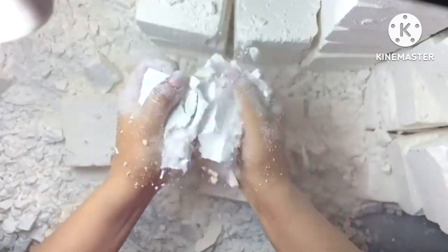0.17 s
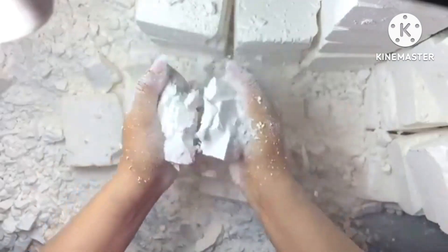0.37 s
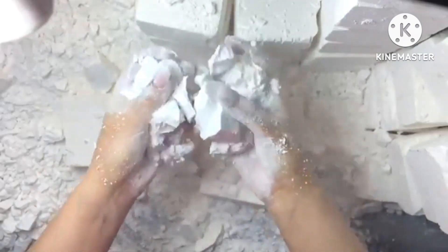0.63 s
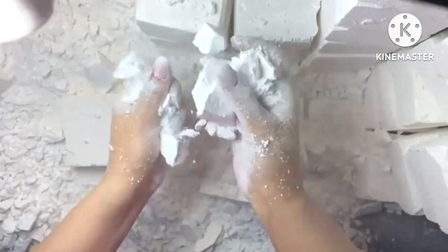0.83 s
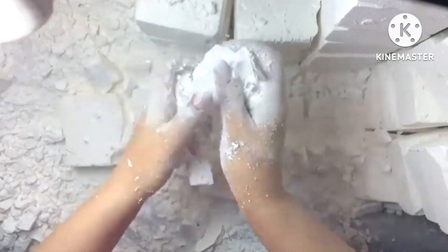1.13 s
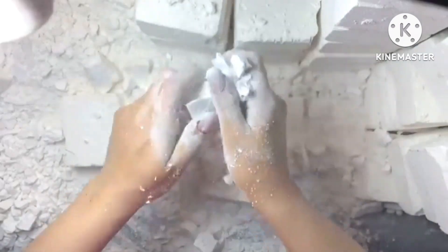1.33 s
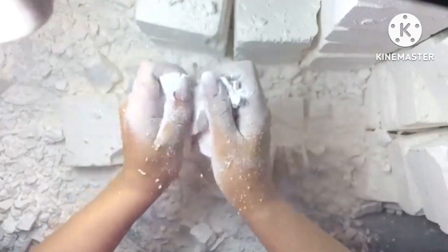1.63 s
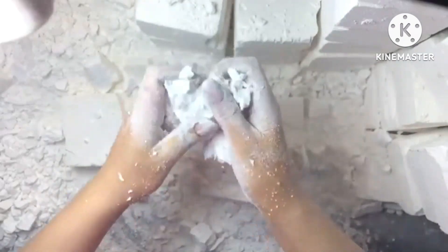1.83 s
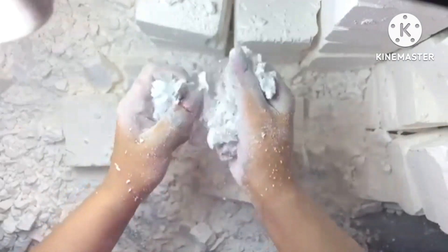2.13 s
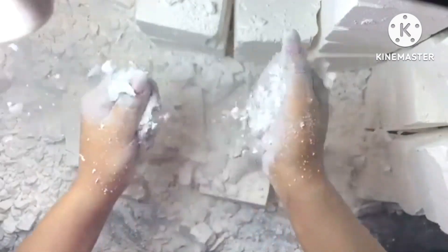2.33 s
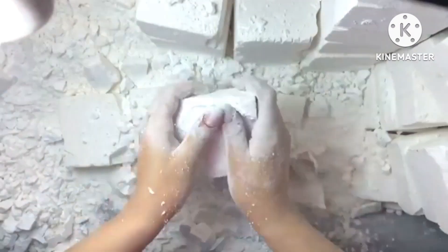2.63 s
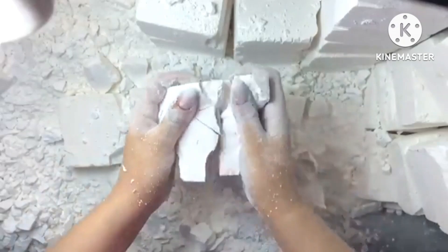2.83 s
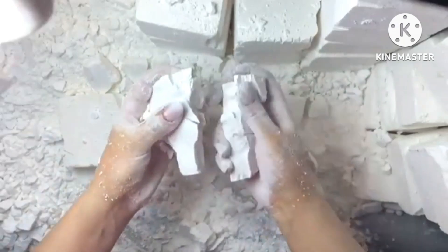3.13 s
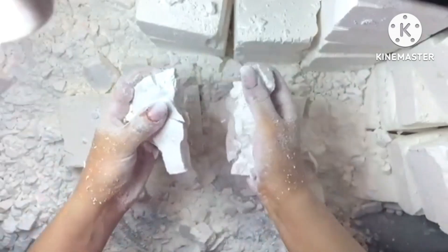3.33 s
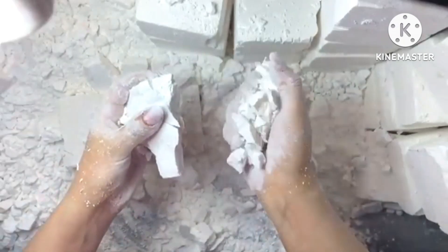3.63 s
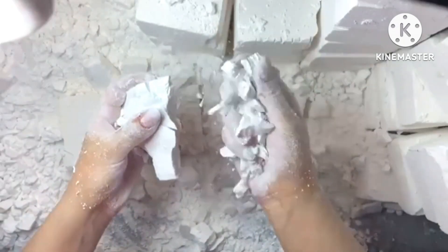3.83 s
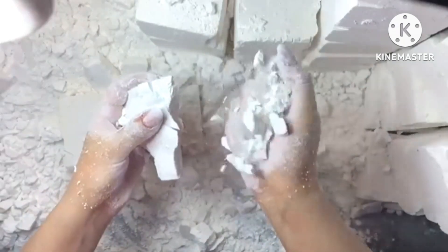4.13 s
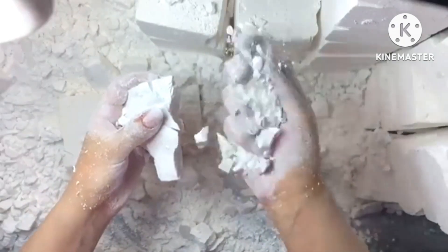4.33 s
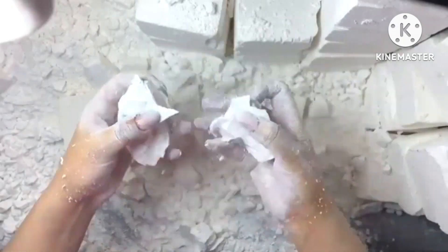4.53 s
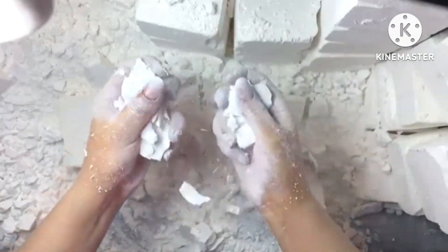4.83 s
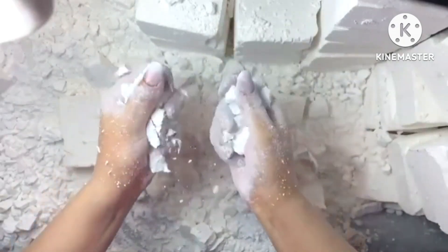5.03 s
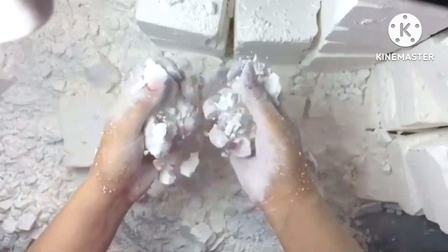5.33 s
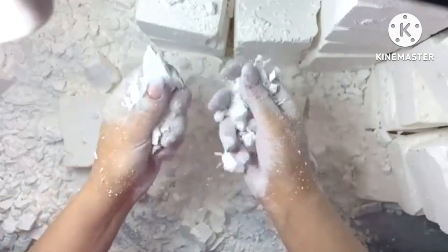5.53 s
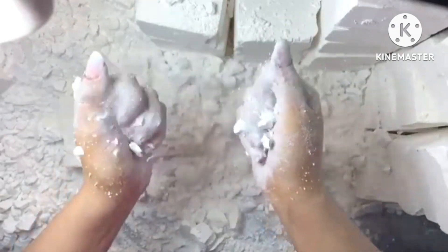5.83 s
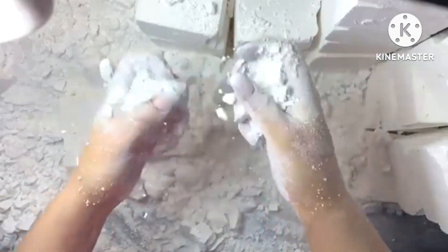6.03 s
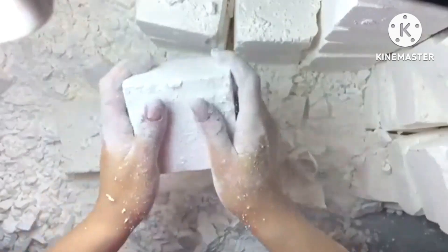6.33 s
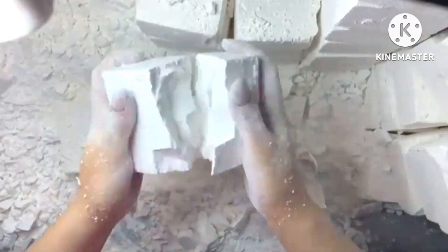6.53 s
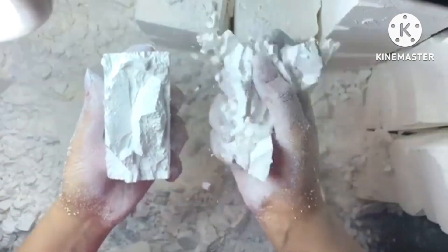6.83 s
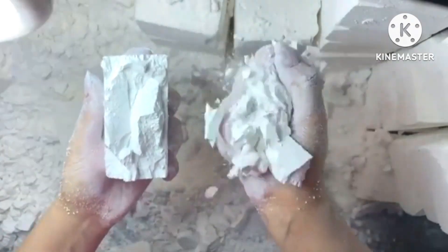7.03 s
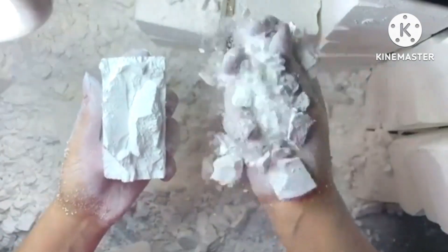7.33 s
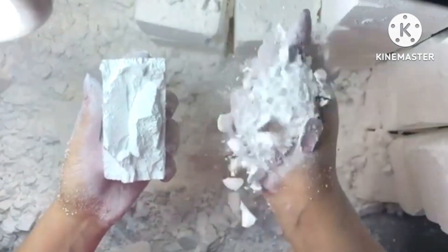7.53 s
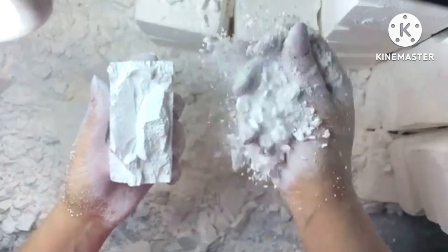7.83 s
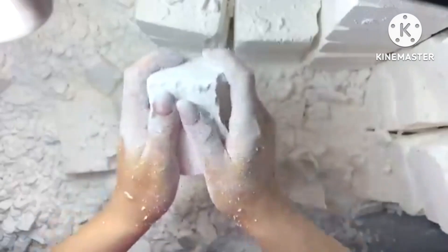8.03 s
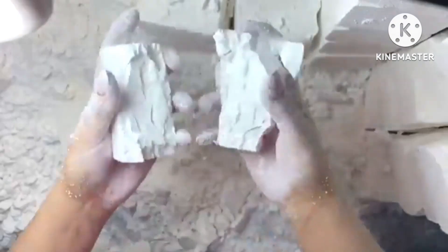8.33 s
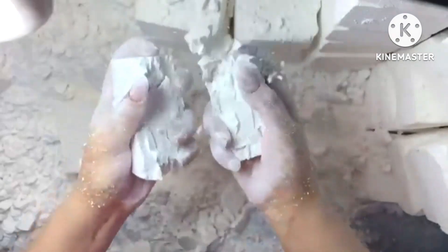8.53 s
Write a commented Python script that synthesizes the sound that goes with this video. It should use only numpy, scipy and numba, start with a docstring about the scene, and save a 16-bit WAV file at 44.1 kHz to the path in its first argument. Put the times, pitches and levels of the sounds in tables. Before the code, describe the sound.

Close, crunchy crumbling of chalky blocks: crisp snaps, crackling crumbs and dusty hiss, fragments knocking, and chunks booming dully on a hollow tray.

```python
"""Dry chalk blocks crack in two hands: each fracture is a burst of jagged noise, part of it ringing, plus faint grit.
Loose fragments knock and squeak; random crumbs crackle over filtered-noise dust that follows the grip.
Lumps boom on a hollow tray (damped modes, saturated), debris patters on it, and splitting blocks push gusts
of air at the phone close above, which clips the loudest sounds and cuts the top."""
import sys
import numpy as np
from scipy import signal
from scipy.fft import rfft, irfft
from scipy.io import wavfile
from scipy.ndimage import uniform_filter1d
from numba import njit

SR = 44100
rng = np.random.default_rng(int(sys.argv[2]) if len(sys.argv) > 2 else 0)


def unload_wav(signal):
    """Save mono or channel-first audio to the path in sys.argv[1] as 16-bit WAV at rate SR, clipped to [-1, 1]."""
    wavfile.write(
        sys.argv[1],
        SR,
        np.round(np.clip(np.atleast_2d(signal).T, -1, 1) * 32767).astype(np.int16),
    )


N = 382347

# single fractures: (time [s], mid-band level [dB], dull knock re mid [dB], bright share re mid [dB],
# fragment ring [Hz], splintering time [ms])
CRACKS = [(0.0062, -19, -18, -4, 2300, 2.1), (0.0266, -16, -1, 0, 586, 9.6),
          (0.068, -19.5, -26, -1.5, 2300, 3.1), (0.112, -29, -3, 2, 7500, 22.5),
          (0.1535, -22.5, -8, 3.5, 2190.0, 3.2), (0.188, -20, -9, 2, 4180.0, 1.8),
          (0.258, -14, -8, -2, 500, 6.7), (0.2647, -11.5, -3, -2, 510, 6.4), (0.327, -35, 10, 14, 547, 1.9),
          (0.3833, -15.5, -11, 0, 8850, 2.7), (0.396, -16, -7, -2.5, 2320, 6.4),
          (0.611, -11.5, -10, -30, 3820, 3), (0.733, -39.5, 10, 20, 8800, 2.6),
          (0.8344, -20, 3, -14, 1700, 1.9), (1.0099, -22.5, -2.5, -2.0, 4150, 2.4),
          (1.037, -16.5, 1, -6, 2424, 3.7), (1.046, -6.5, 3, -6, 2320, 1.8),
          (1.1512, -24, 4.5, 6, 510, 2.3), (1.16, -15, -3, -5, 2200, 3), (1.6095, -6, -5.5, -3, 3250, 2.6),
          (1.741, -24.5, -4, 1, 3200, 1.7), (1.8147, -11, -14.5, -9.5, 1800, 1.35),
          (2.088, -27.5, -3, 4.5, 2200, 2.9), (2.1718, -19.5, -1.5, -1.5, 786, 3.6),
          (2.316, -18.5, -21, -3, 4230, 0.49), (2.3832, -12, 6, -22, 540, 1.9),
          (2.56, -19, -6.5, -14, 3570, 4.4), (2.826, -24.5, -30, 11, 8350, 4.5),
          (2.8323, -14.5, -41, -5, 5840, 6.7), (3.131, -28, -12, -2, 4500, 0.82),
          (3.1427, -25.5, 0, 1.5, 525, 2.2), (3.169, -25, -10, 0, 4060, 2.6),
          (3.1966, -30, -11, 8, 7870.0, 2.4), (3.2377, -27, -6, 9, 7670.0, 1.5),
          (3.276, -27.5, -20.0, 14, 7900, 2.1), (3.318, -18, -14, 5.5, 8000, 6.8),
          (3.3278, -6, -24, -4.5, 4220, 4.4), (3.343, -18, -15, 0, 7260, 9),
          (3.365, -12, -11, -7, 2150, 3.3), (3.382, -13.5, -32, 4, 6080, 3.5),
          (3.397, -19, -27, 4, 6400, 2), (3.4121, -11.5, -11.5, 0, 4300, 2),
          (3.427, -20, -31, 8, 7500, 1.4), (3.434, -17.5, -15, 3, 8320.0, 7.8),
          (3.446, -21, -18, 0, 4240, 5.7), (3.456, -17, -24, 6, 8600, 0.58),
          (3.4858, -9, -26, 2, 4650, 1.4), (3.493, -19, -17, -1, 2300, 2.7),
          (3.504, -15, -29, 0, 4400, 2.1), (3.5372, -20, -7, 8, 7910.0, 1.3),
          (3.574, -22.5, -23, 12, 8180.0, 1.4), (3.581, -25, -14, 6, 8200, 2),
          (3.61, -34.5, -17, 26, 7100, 0.98), (3.647, -29, -29, 10.5, 8000, 3.1),
          (3.7176, -21, -14, -4, 4240, 3.1), (3.7938, -31.5, -4, 8, 8630.0, 3.6),
          (4.0197, -9, -13, 4.5, 8200, 2.6), (4.052, -25.5, -9, 16, 8650, 4.3),
          (4.066, -26.5, -4.5, 8, 8600.0, 4.1), (4.1149, -13.5, -18, -7, 4300, 1.6),
          (4.125, -21, -11.0, 2, 8040.0, 1.2), (4.151, -14.5, -2, 0.5, 2480, 1.7),
          (4.183, -24, -2, -6, 2210.0, 9.4), (4.235, -33, -4, 14, 520.0, 1),
          (4.2565, -29, 16, -10, 455, 1.5), (4.423, -15.5, -13, 2.5, 5800, 5),
          (4.465, -5, -13, -6, 4400, 2.8), (4.5188, -10, -27, -8, 3600, 3.5),
          (4.529, -13, -14, -9.0, 3500, 1.6), (4.5414, -17, -14, 4, 4300, 1.7),
          (4.731, -18.5, -14, 3, 7000, 1.3), (4.7688, -22, -3.5, 13.5, 8100, 1.4),
          (4.7914, -21, -18, 7, 4270, 5.8), (4.801, -6.5, -17, 1.5, 4200, 7.5),
          (4.837, -18, -16, 6, 4230.0, 2.6), (4.848, -15, -10, 4.5, 6300, 7.3),
          (4.8719, -24, -22, 12, 8260.0, 1.5), (4.8826, -25.5, -21, 12.5, 10100, 5.3),
          (4.9224, -8.5, -11, 1, 4800, 2.6), (4.941, -14.5, -27, -7, 2450, 3.6),
          (4.9663, -21.5, -8, 7, 3740.0, 3), (4.973, -16, -25, -2, 4170.0, 1.7),
          (4.9836, -20, -21, 10, 8000.0, 1.9), (4.9964, -10.5, -14, 0, 3000, 2.5),
          (5.005, -22, -25, 16, 8040, 2.5), (5.026, -5, -14.5, -4, 4830.0, 3.1),
          (5.047, -18, -13, 11.5, 7800, 2.5), (5.067, -5, -19, -3.5, 4670, 4),
          (5.087, -13, -23, -3, 4200, 2.6), (5.101, -11, -15, -6, 2860, 3.4),
          (5.1324, -20, -31, -9, 4620, 3.7), (5.1852, -12, -12, 7.5, 7400, 1.2),
          (5.201, -17.5, -26, 7.5, 8400, 2.3), (5.2162, -11, -20, 8.5, 7200, 1.4),
          (5.3442, -10.5, -4.5, -26, 1700, 1.16), (5.46, -15, -16, -14, 2400, 2.3),
          (5.515, -19.5, -25, -0.5, 4930, 2.6), (5.5342, -23.5, -8, 1, 3260, 4),
          (5.598, -27.5, 5, 13, 6130.0, 2.5), (5.6093, -14, -23, 2, 6450, 3.6),
          (5.6277, -33, -20, 20, 5850.0, 2.7), (5.781, -24, -7, 3, 8950, 5.5),
          (5.927, -6, -17, -1.5, 4800, 5.4), (5.974, -18, -21, -5, 4700, 1.6),
          (6.285, -17, -18, 0, 3030.0, 1.9), (6.348, -25, -10, 8, 10600, 6.2),
          (6.4103, -23.5, -22, 2, 4330, 0.89), (6.424, -30, -16, 2, 4270, 6.3),
          (6.4789, -11.5, -17, 2, 4200, 6.2), (6.7413, -20, -3, 1, 3500, 5.6),
          (6.866, -19.5, -9, -2, 7600, 7), (6.888, -20, -4, 4.5, 3400.0, 4.3),
          (6.9, -22, -1, 3.5, 6240, 7.8), (6.953, -28, -6, 8, 7980.0, 3.3),
          (6.9668, -24, -12, 7, 3620.0, 2.4), (7.03, -13.5, -15, -6, 2520, 2.7),
          (7.1012, -16.5, -12, -18, 1650, 1.2), (7.109, -23, 0, -2, 8270.0, 4),
          (7.183, -12, -16, -10, 4160.0, 1.4), (7.21, -23.5, 6, 4, 485, 1.3),
          (7.226, -27.5, 1, -22, 1100, 9), (7.419, -26, -18, 1.5, 3520, 3.5),
          (7.448, -23, -17, 2, 4890.0, 2.6), (7.4875, -9, -29.0, -7, 4300, 2.5),
          (7.54, -17.5, -2, 0, 3570, 1.8), (7.6657, -23, -5, -13, 4170, 11),
          (8.028, -17, -20, -2, 4900, 1.2), (8.159, -16.5, -10.5, 1.5, 4000, 6.2),
          (8.6077, -7.5, -16, 5, 8400, 2.3), (8.628, -21, -5, 2, 6300, 12.6)]
# loose fragments knocking together: (time [s], level [dB], ring [Hz])
KNOCKS = [(.249, -17, 2200), (.313, -17, 4740), (.422, -16, 484), (.498, -19, 538), (.517, -13, 564),
          (.621, -8, 510), (.6255, -13, 3770), (.637, -14, 568), (.669, -16, 487), (.694, -17, 441),
          (.781, -16, 550), (.89, -23, 1700), (.954, -21, 8690), (1.067, -22, 1700), (1.115, -25, 2300),
          (1.33, -15, 585), (1.725, -20, 3140), (1.75, -13, 450), (1.771, -18, 2200), (2.359, -23, 1000),
          (2.472, -14, 2300), (2.485, -19, 590), (2.518, -20, 2400), (2.592, -21, 1160), (2.757, -11, 587),
          (3.306, -22, 8000), (3.476, -18, 2300), (4.281, -21, 1400), (5.428, -15, 11000),
          (5.552, -18, 5980), (5.664, -15, 2320), (5.746, -18, 2280), (5.866, -18, 4610),
          (5.912, -15, 4570), (7.076, -15, 520), (7.13, -15, 4300), (7.247, -20, 4210), (7.276, -17, 5050),
          (7.305, -21, 3710), (7.352, -23, 2221), (7.467, -20, 1000), (7.525, -13, 441), (7.587, -17, 1750),
          (7.685, -17, 1000), (7.802, -12, 1730), (7.85, -17, 1750)]
# thin squeaks: (time [s], level [dB], pitch [Hz])
SQUEAKS = [(5.79, -21, 9000), (5.805, -32, 6900)]
# squeezes of the crumbs: (start [s], level [dB], held [s])
SQUEEZES = [(0.0, -33, 0.057), (.2, -30.5, 0.24), (.42, -33.5, 0.12), (.62, -31.5, 0.27),
            (.95, -36.5, 0.078), (1.12, -42, 0.11), (1.3, -33.5, 0.2), (1.6, -36, 0.2),
            (2.007, -28.5, 0.0064), (2.199, -36, 0.039), (2.37, -34, 0.28), (2.741, -30, 0.085),
            (2.9, -43, 0.18), (3.2, -39.5, 0.085), (3.441, -32, 0.2), (3.78, -35.5, 0.2),
            (4.16, -30, 0.047), (4.28, -39.5, 0.099), (4.46, -33.5, 0.33), (4.81, -30, 0.068),
            (5.0, -27.5, 0.23), (5.27, -33.5, 0.15), (5.51, -38.5, 0.053), (5.6, -30, 0.18),
            (5.92, -28, 0.018), (6.09, -34, 0.026), (6.252, -30.5, 0.089), (6.5, -46.5, 0.22),
            (6.73, -36.5, 0.052), (6.89, -33, 0.075), (7.06, -32, .28), (7.43, -31.5, 0.14),
            (7.669, -27, 0.011), (7.82, -35.5, 0.065), (7.96, -34.5, 0.14), (8.17, -37, 0.015),
            (8.34, -39, 0.032), (8.476, -33.5, 0.048), (8.62, -31, 0.057)]
# treble share in crumbs and dust: (time [s], level [dB])
TREBLE = [(0, 0), (2.8, 0.5), (3.4, 3), (4.4, -2), (5.1, 4), (5.9, 2), (6.9, 3.5), (7.2, -2.5), (7.8, 2.5),
          (8.2, 2), (8.34, 4), (8.55, 5.5), (8.62, 3)]
# gusts from splitting blocks: (time [s], level [dB], length scale [ms])
GUSTS = [(3.328, -12, 14), (4.799, -15, 27), (6.481, -13.5, 30), (8.156, -21, 45)]
# lumps landing on the tray: (time [s], level [dB], deep share [dB], build-up [ms])
DROPS = [(0.028, -16, -24, 1), (0.14, -16.5, -19, 12), (0.254, -20, 6.5, 7), (0.43, -10, -6, 13),
         (0.531, -20, -25, 14), (0.606, -16, 4, 12), (0.634, -8.5, 1, 22), (0.689, -11, -2, 17),
         (0.793, -16.5, -22, 17), (0.845, -13.5, -13, 20), (1.046, -9, -1, 4), (1.057, -2, -5.5, 16),
         (1.105, -13.5, -12, 12), (1.133, -8, -4, 16), (1.307, -17.5, -5, 14), (1.344, -8, -19, 9.8),
         (1.408, -16, -5, 9.8), (1.627, -11.5, 1.5, 5.7), (1.754, -18.5, 3, 11), (1.819, -13.5, -1, 11),
         (2.396, -9.5, -12, 13), (2.528, -19, -30, 13), (2.707, -13, -15, 36), (3.147, -12.5, 0, 9.5),
         (3.721, -24.5, -2.5, 13), (3.941, -17.5, -11, 23), (4.151, -13.5, -12, 11), (4.174, -6, -14, 18),
         (4.521, -14.5, -6, 18), (4.586, -15, -9, 23), (4.791, -38, 14, 7.9), (5.066, -21, -2, 2.4),
         (5.271, -18, -29, 24), (5.615, -22, -4, 9.1), (5.933, -14.5, -0.5, 4.6), (6.27, -13.5, -13, 18),
         (6.482, -29.5, 3, 6.3), (6.876, -22, -8, 11), (7.034, -16, -1, 22), (7.076, -13, -4, 13),
         (7.171, -11.5, 0, 15), (7.419, -16.5, 0, 12), (7.452, -14, -5, 14), (7.684, -16.5, -27, 12),
         (8.032, -15.5, -26, 22), (8.161, -30, 7.5, 8.2), (8.633, -17.5, -10, 24)]
# debris pattering on the tray: (time [s], level [dB])
PATTER = [(0.0, -32.5), (0.58, -29), (2.32, -35), (2.63, -33), (2.85, -40), (3.84, -45), (4.18, -31),
          (5.14, -39), (5.67, -32), (6.69, -44.5), (7.53, -29.5), (8.38, -41.5), (8.67, -32)]
# upper tray modes: (frequency [Hz], level [dB], t60 [s])
TRAY_UPPER = [(152.26, 0, 0.18), (135.5, -7, 0.14), (164.5, -12.5, 0.41), (122.6, -9, 0.11),
              (263.4, -23, 0.049)]
# deep tray modes: (frequency [Hz], level [dB], t60 [s])
TRAY_DEEP = [(77.6, -4.5, 0.32), (97.7, 0, 0.05)]
# spectrum of chalk, hands and microphone: (frequency [Hz], density [dB per Hz])
COLOUR = [(150, -28), (250, 3), (330, -0.5), (553, -0.5), (768, -9), (1030, -2.5), (1410, -9), (2240, -3),
          (2660, -8.5), (3010, -3), (4240, -4), (5500, -12), (8180, -5.5), (14700, -12.5), (15500, -12.5)]
# chalk resonances, three narrow and one broad: (centre [Hz], width [Hz], gain [dB])
CHALK_RINGS = [(520, 53, 0), (2320, 120, 4.5), (4620, 2000, 4), (5980, 140, 5)]

MID_LO_HZ, MID_HI_HZ = 1500, 6000  # band edges dull / mid / bright
CRUMBS_PER_S, CRUMB_SCATTER_DB = 380, 2.0
DUST_GRAIN_DB = 4.2  # before slewing
CLOSE_DB_PER_S, SAG_DB_PER_S, OPEN_DB_PER_S, REST_DB = 171, 6, 187, -53  # closing, held, letting go, slack
THIN_DB_PER_DB = 0.19  # a slack grip sounds thinner
SLAM_S, SLAM_DRIVE_DB, SLAM_HZ, SLAM_T60_S = 0.2585, 4.5, 120, 0.058  # drive into the tray's saturation
TOP_HZ = 15400


def undb(db):
    """dB to gain."""
    return 10 ** (np.asarray(db, float) / 20)


def curve(table):
    """Two-column table interpolated to every sample."""
    s, value = np.transpose(table)
    return np.interp(np.arange(N) / SR, s, value)


def unit(x):
    """Scale to rms 1."""
    return x / np.sqrt(np.mean(x ** 2))


def wander(hold):
    """Random levels, each held for hold samples and slewed."""
    steps = np.repeat(rng.standard_normal(N // hold + 1), hold)[:N]
    return uniform_filter1d(steps, hold // 2)


def band(x, lo_hz, hi_hz):
    """Steep band-pass."""
    return signal.sosfilt(signal.butter(3, [lo_hz, hi_hz], "band", fs=SR, output="sos"), x)


def colour(x, points, size=1024):
    """Minimum-phase filter: spectrum plus chalk resonances, via the folded cepstrum of the log gain."""
    hz, db = np.transpose(points)
    f_hz = np.arange(size // 2 + 1) * SR / size + 1
    gain_db = np.interp(np.log(f_hz), np.log(hz), db)
    for centre_hz, width_hz, ring_db in CHALK_RINGS:
        gain_db = gain_db + ring_db / (1 + (2 * (f_hz - centre_hz) / width_hz) ** 2)
    cepstrum = irfft(gain_db * np.log(10) / 20)
    cepstrum[1:size // 2] *= 2
    cepstrum[size // 2 + 1:] = 0
    return signal.fftconvolve(x, irfft(np.exp(rfft(cepstrum))))[:N]


def ring(x, modes):
    """Damped modes struck by x."""
    t = np.arange(SR // 2) / SR
    body = sum(undb(db) * np.sin(2 * np.pi * hz * t) * 1000. ** (-t / t60_s) for hz, db, t60_s in modes)
    return signal.fftconvolve(x, body)[:N]


@njit
def bursts(start, rise, hold, fall, size, hz, width, share, noise):
    """Noise bursts that swell, hold and die away (samples); a share of the energy passes a one-pole resonator."""
    out = np.zeros(len(noise))
    for e in range(len(start)):
        end = min(len(noise), start[e] + int(hold[e] + 7 * fall[e]) + 1)
        t = np.arange(end - start[e])
        swell = np.minimum(1., (t + 1) / (rise * hold[e] + 1))
        shape = swell * np.exp(-np.maximum(t - hold[e], 0.) / fall[e])
        plain = shape * noise[start[e]:end]
        rung = np.zeros(len(t))
        pole = np.exp((2j * np.pi - np.pi * width) * hz[e] / SR)  # width relative to pitch
        z = 0j
        for i in t:
            z = z * pole + plain[i]
            rung[i] = z.real
        plain_gain = np.sqrt((1 - share[e]) / np.sum(plain ** 2))
        rung_gain = np.sqrt(share[e] / np.sum(rung ** 2))
        mix = plain_gain * plain + rung_gain * rung
        out[start[e]:end] += size[e] * mix * np.sqrt(np.sum(shape ** 2) / np.sum(mix ** 2))
    return out


def splinter(s, db, dull_db, bright_db, hz, hold_ms, fall_ms, rise, share, width, jag_db, off_ring_db=0):
    """Fractures: jagged noise bursts in three bands; the band holding the fragment's pitch also rings."""
    jags_db = jag_db * np.repeat(rng.standard_normal(N // 24 + 1), 24)[:N]
    noise = colour(rng.standard_normal(N) * undb(jags_db), COLOUR)
    start = (s * SR).astype(np.int64)
    hold, fall = hold_ms * SR / 1000, fall_ms * SR / 1000
    bands = [(250, MID_LO_HZ, dull_db), (MID_LO_HZ, MID_HI_HZ, 0), (MID_HI_HZ, 17000, bright_db)]
    out = 0
    for lo_hz, hi_hz, share_db in bands:
        inside = (lo_hz < hz) & (hz <= hi_hz)
        size = undb(db + share_db - off_ring_db * ~inside)
        out = out + bursts(start, rise, hold, fall, size, hz, width, share * inside, band(noise, lo_hz, hi_hz))
    return band(out, 120, 21800)


def gusts():
    """Air pushed at the microphone: a quick suck, then a slower swing back."""
    out = np.zeros(N)
    for s, db, ms in GUSTS:
        t = np.maximum(np.arange(N) / SR - s, 0) * 1000 / ms  # in gust lengths
        out -= undb(db) * np.sin(2 * np.pi * t ** 0.39) * np.exp(-2.2 * t)
    return out


def patter():
    """Debris on the tray: sparse random soft pushes excite its modes."""
    push = np.hanning(int(0.0038 * SR))
    hits = undb(curve(PATTER)) * rng.standard_normal(N) * (rng.random(N) < 150 / SR)  # 150 per s
    hits = np.convolve(hits, push / push.sum())[:N]
    return undb(-0.5) * ring(hits, TRAY_UPPER) + undb(-3.0) * ring(hits, TRAY_DEEP)


def thud(modes, rise_ms, phase):
    """One landing: modes build up as the lump crumbles, then settling powder chokes them; pitch varies a little."""
    t, rise_s = np.arange(SR // 2) / SR, rise_ms / 1000
    swell = np.sin(np.pi / 2 * np.minimum(t / rise_s, 1)) ** 2
    after_s = np.maximum(t - rise_s, 0)
    pitch = 1 + 0.086 * (phase[-1] - np.mean(phase))
    out = 0
    for (hz, db, t60_s), p in zip(modes, phase):
        decay = 1000. ** -((after_s / t60_s) ** 1.14)
        out = out + undb(db) * np.sin(2 * np.pi * hz * pitch * t + p) * decay
    return swell * out


def drops():
    """Soft lumps landing: upper and deep tray modes, random phases."""
    out = np.zeros(N + SR)
    phases = rng.random((len(DROPS), 2, len(TRAY_UPPER)))
    for (s, db, deep_db, rise_ms), phase in zip(DROPS, phases):
        boom = thud(TRAY_UPPER, rise_ms, 0.36 * phase[0]) + undb(deep_db) * thud(TRAY_DEEP, rise_ms, phase[1])
        out[int(s * SR):int(s * SR) + len(boom)] += undb(db) * boom
    return out[:N]


def slam():
    """One heavy piece hits the tray: a single mode, damped at once."""
    out = np.zeros(N)
    t = np.arange(SR // 4) / SR
    tone = np.sin(2 * np.pi * SLAM_HZ * t) * 1000. ** (-t / SLAM_T60_S)
    out[int(SLAM_S * SR):][:len(t)] = undb(SLAM_DRIVE_DB) * tone
    return out


def tray():
    """All tray sounds, saturated: the loudest booms flatten and buzz."""
    return np.tanh(1.7 * (patter() + drops() + slam())) / 1.4


def grip():
    """Crumbling level [dB]: each squeeze closes fast, sags while held, lets go; powers add."""
    t = np.arange(0, N + 64, 64) / SR
    power = undb(REST_DB) ** 2
    for s, db, held_s in SQUEEZES:
        after_s = np.maximum(t - s, 0)
        down_db = CLOSE_DB_PER_S * np.maximum(s - t, 0) + SAG_DB_PER_S * after_s
        down_db = down_db + OPEN_DB_PER_S * np.maximum(after_s - held_s, 0)
        power = power + undb(db - down_db) ** 2
    return np.interp(np.arange(N) / SR, t, 10 * np.log10(power))


def dust(grip_db, dull_db, bright_db):
    """Dust: grainy noise in three bands, each wandering in level, following the grip."""
    noise = colour(rng.standard_normal(N) * undb(DUST_GRAIN_DB * wander(hold=40)), COLOUR)
    mid = undb(2.1 * wander(hold=700)) * unit(band(noise, MID_LO_HZ, MID_HI_HZ))
    bright = undb(bright_db + 2.5 + 3.6 * wander(hold=700)) * unit(band(noise, MID_HI_HZ, 21700))
    dull = undb(dull_db + 8.5 + 2.45 * wander(hold=700)) * unit(band(noise, 137, MID_LO_HZ))
    return undb(grip_db - 4.5) * (mid + bright + dull)


def crumbs(grip_db, dull_db, bright_db):
    """Small fractures at random times, varied in size and colour, with a wandering level."""
    count = int(CRUMBS_PER_S * N / SR)
    when, size, dull, bright, length, pitch = rng.random((count, 6)).T
    s = when * (N - 99) / SR
    at = (s * SR).astype(int)
    # bright moments are mostly sliding powder, with weak crumbs
    level_db = grip_db - 2.9 * np.maximum(bright_db - 2.0, 0) + 3 * wander(hold=900)
    db = level_db[at] - 3.5 - CRUMB_SCATTER_DB * np.log(1 - 0.9 * size)
    return splinter(s, db, dull_db[at] + 22 * (dull - .5), bright_db[at] - 3.5 + 22 * (bright - .5),
                    1300 * 7.47 ** pitch, 4.5 * length ** 2, 0.6 + 2.4 * length,
                    rise=0.65, share=0.96, width=0.089, jag_db=6.5, off_ring_db=3.0)


def crumbling():
    """Crumbs and dust under one grip, which also sets their colour."""
    grip_db = grip()
    bright_db = curve(TREBLE) - THIN_DB_PER_DB * (grip_db - np.mean(grip_db))
    dull_db = -10.0 - 0.17 * (grip_db + 53.0)  # a hard grip grinds finer
    return crumbs(grip_db, dull_db, bright_db) + dust(grip_db, dull_db, bright_db)


def squeaks():
    """Thin squeaks: sines held briefly, then cut off smoothly."""
    out = np.zeros(N)
    t = np.arange(SR // 20) / SR
    for s, db, hz in SQUEAKS:
        out[int(s * SR):][:len(t)] += undb(db) * np.sin(2 * np.pi * hz * t) * np.exp(-(t / 0.018) ** 3)
    return out


def knocks():
    """Loose fragments knocking: short noise bursts ringing at each one's pitch."""
    s, db, hz = np.transpose(KNOCKS)
    same = np.ones(len(s))
    return splinter(s, db, -6.5, -5.0, hz, 1.33 * same, 1.86 * same,
                    rise=0.31, share=0.6, width=0.2, jag_db=2.5, off_ring_db=8.0)


def cracks():
    """Single fractures, each a snap with a faint tail of falling grit."""
    s, db, dull_db, bright_db, hz, ms = np.transpose(CRACKS)
    snap = splinter(s, db, dull_db, bright_db, hz, ms, 0.46 + 0.32 * ms,
                    rise=0.12, share=0.51, width=0.14, jag_db=4.5)
    grit = splinter(s, db - 13.5, dull_db + 0.5, bright_db, hz, ms, np.full_like(ms, 7.5),
                    rise=0.77, share=0.3, width=0.21, jag_db=5.5)
    return snap + grit


def scene():
    """All sources, one microphone."""
    return (gusts() + tray() + crumbling() + squeaks() + knocks() + cracks())[None]


def record(dry):
    """Phone: hard-limits the loudest peaks, then low-passes steeply."""
    limited = np.clip(dry, -.97, .97)
    return signal.sosfilt(signal.ellip(8, .2, 85, TOP_HZ, fs=SR, output="sos"), limited)


dry = scene()
out = record(dry)
unload_wav(out)
```